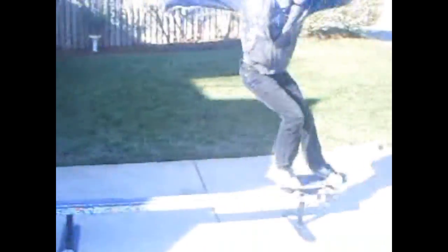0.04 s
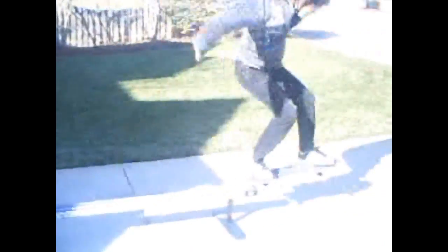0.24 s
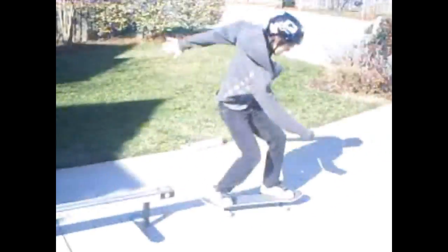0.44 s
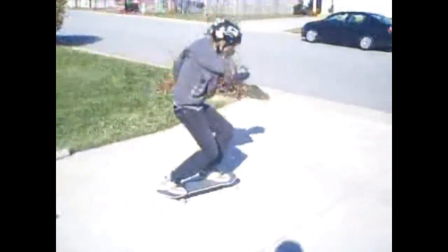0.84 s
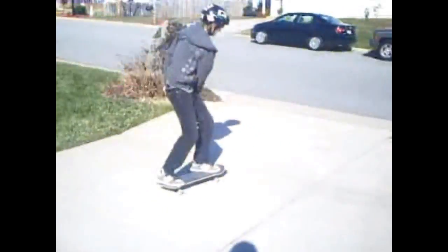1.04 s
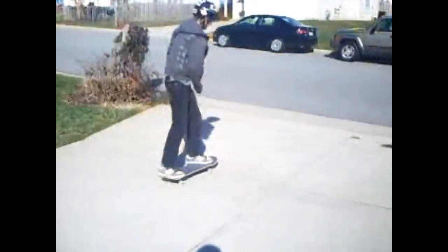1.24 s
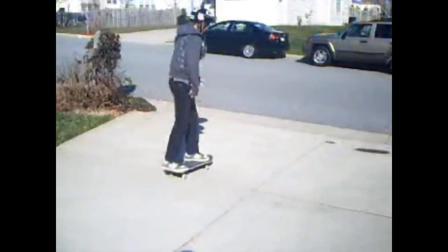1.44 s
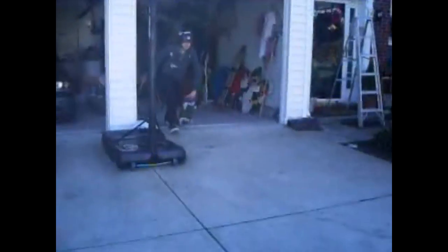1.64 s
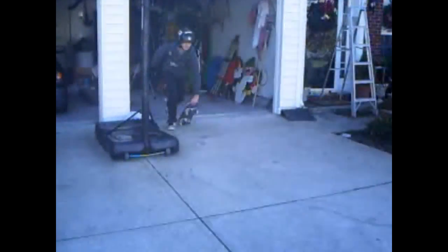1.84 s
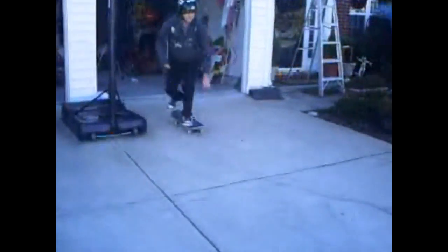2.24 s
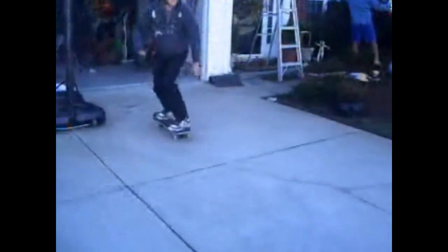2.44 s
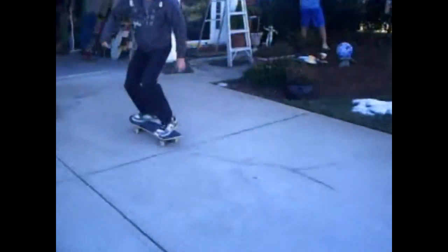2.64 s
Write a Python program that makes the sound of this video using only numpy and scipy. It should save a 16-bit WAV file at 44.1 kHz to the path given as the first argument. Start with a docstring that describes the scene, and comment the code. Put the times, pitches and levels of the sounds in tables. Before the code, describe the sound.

Skateboard clattering on a ringing steel rail, landing hard, then wheels rolling on concrete with clacks.

```python
"""A skateboard clatters off a steel rail, which rings on; it slaps down on concrete and rolls away.
After an abrupt change of scene the board is set down farther off, stepped on, and rolls closer.
Impacts excite damped modes of rail and deck, grit under the wheels drums on the board, and a yard
echoes the knocks. A small camera adds microphone wind, a brief motor buzz and overload on loud blows."""
import sys
import numpy as np
from scipy import signal
from scipy.fft import rfft, irfft
from scipy.io import wavfile
from scipy.ndimage import uniform_filter1d

SR = 44100
rng = np.random.default_rng(int(sys.argv[2]) if len(sys.argv) > 2 else 0)


def wav_out(sig):
    """Save sig, one row per channel (or a flat mono array), as 16-bit PCM at SR to the path in sys.argv[1]."""
    wavfile.write(sys.argv[1], SR, np.round(np.clip(np.atleast_2d(sig).T, -1, 1) * 32767).astype(np.int16))


N = 119070
T = np.arange(N) / SR
BIN_HZ = np.arange(N // 2 + 1) * SR / N
CUT_S = 1.626  # the scene changes
BAND_HZ = 5770  # upper edge of the camera's passband


def undb(db):
    """Decibels to amplitude ratio."""
    return 10 ** (np.asarray(db) / 20)


def unit(x):
    """Normalise to rms 1."""
    return x / np.sqrt(np.mean(x ** 2))


def on_log(points, hz):
    """Interpolate (frequency_hz, value) points on a log-frequency axis."""
    point_hz, values = np.array(points, float).T
    return np.interp(np.log(hz + 1e-9), np.log(point_hz), values)


def fader(points):
    """Amplitude envelope through (time_s, level_db) points, silent outside them."""
    time_s, level_db = np.array(points, float).T
    return undb(np.interp(T, time_s, level_db)) * (T >= time_s[0]) * (T <= time_s[-1])


def colour(x, points, tilt_db=0):
    """Band-limited filter through (frequency_hz, gain_db) points, tilted per octave about 1 kHz."""
    octaves = np.log2(np.clip(BIN_HZ, 100, 6000) / 1000)
    gain = undb(on_log(points, BIN_HZ) + tilt_db * octaves)
    return irfft(rfft(x) * gain * (BIN_HZ < BAND_HZ + 500), N)


def noise(points, tilt_db=0):
    """Spectrally shaped Gaussian noise of rms 1."""
    return unit(colour(rng.standard_normal(N), points, tilt_db))


def resonant_noise(hz, skirt_db):
    """Noise in one broad resonance, falling by skirt_db per octave below it and faster above."""
    return noise([(hz / 4, 2 * skirt_db), (hz, 0), (hz * 4, 3 * skirt_db), (hz * 16, 6 * skirt_db)])


def decay(start_s, t60_s, attack_s=0.00047):
    """Envelope of a damped vibration: quick onset, exponential fall."""
    age = np.maximum(T - start_s, 0)
    return (1 - np.exp(-age / attack_s)) * np.exp(-np.log(1000) * age / t60_s)


def ring(modes, start_s):
    """Free vibration: a sum of damped modes struck together."""
    return sum(undb(db) * decay(start_s, t60) * np.sin(2 * np.pi * hz * (T - start_s))
               for hz, db, t60 in modes)


def drift(rate_hz):
    """Smoothed random steps of rms 1."""
    size = int(SR / rate_hz)
    steps = np.repeat(rng.standard_normal(200), size)[:N]
    return unit(uniform_filter1d(np.resize(steps, N), size))


def rail():
    """Modal ringing: each strike clangs and feeds a steel tube's long modes, whose close pairs beat."""
    # trucks striking the rail: start_s, level_db
    strikes = [(0.2008, 0.5), (0.206, -3.5), (0.213, 7.5), (0.2187, 2), (0.229, 0.5), (0.238, 4),
               (0.251, 2.5), (.263, -8.5), (0.277, -17), (0.284, -20.5)]
    # tube modes, in parallel lists: pitch_hz, level_db, t60_s
    mode_hz = [498, 688, 699, 719, 781, 875, 906, 945, 992, 1256, 1413, 1488, 1678, 2163, 2971, 3371, 3531,
               4220, 5065, 5162, 5200]
    mode_db = [-22, -5.5, -8, -3, -6, -5.5, 3, -2.5, -8, -11.5, 0, -12, -13, -11, -15.5, -7, -13.5, -14.5,
               -9.5, -7, -7]
    mode_t60_s = [1.1, 1.25, 1.3, 1, .5, .55, .55, .7, .9, 1.0, .43, .41, .51, .5, .6, .24, .37, .38, .38,
                  .38, .4]
    # spectrum of dense modes and rattle: frequency_hz, density_db
    shimmer_spectrum = [(120, -47), (350, -18), (600, -26), (760, -7), (920, -5.5), (1150, -19.5),
                        (1480, -15.5), (1800, -24.5), (2130, -18.5), (2600, -24.5), (3400, -21.5),
                        (4600, -28), (5340, -13.5), (5800, -23.5)]
    # their damping by band: centre_hz, t60_s
    shimmer_bands = [(300, .7), (900, 0.89), (2500, 0.69), (5500, 0.49)]
    # contact noise spectrum: frequency_hz, density_db
    clang_spectrum = [(100, -14.5), (330, -15.5), (570, -20), (865, 4), (1120, -22), (1420, 1.5),
                      (1800, -13.5), (2170, -12.5), (2700, -20), (3430, -9), (4700, -16.5), (5280, -7),
                      (5800, -14.5)]

    def envelope(t60_s):
        """Incoherent summation: the decaying strikes add in energy."""
        return np.sqrt(sum((undb(db) * decay(start, t60_s)) ** 2 for start, db in strikes))

    age = T - strikes[0][0]
    waver_db = 2.0
    tube = 0
    for hz, db, t60 in zip(mode_hz, mode_db, mode_t60_s):
        gain = undb(db + waver_db * drift(rate_hz=21.5))
        tube += gain * envelope(t60) * np.sin(2 * np.pi * hz * age)
    dense_modes = rfft(noise(shimmer_spectrum))
    shimmer = 0
    for centre_hz, t60 in shimmer_bands:
        band_share = on_log([(hz, hz == centre_hz) for hz, _ in shimmer_bands], BIN_HZ)
        shimmer += irfft(dense_modes * band_share, N) * envelope(t60)
    clang = noise(clang_spectrum) * envelope(t60_s=0.098)
    return undb(-29) * tube + undb(-26) * shimmer + undb(-16.5) * clang


def board():
    """Impact excitation: blows on concrete crack and ring the deck; weight and flex thump beneath."""
    # thumps of the trucks first meeting the rail, then of the rider's weight: start_s, level_db, centre_hz,
    # t60_s
    thumps = [(.202, -19, 340, 0.17), (0.709, -6, 150, 0.035), (1.503, -33, 65, 0.095),
              (2.39, -28, 260, 0.1)]
    # board meeting concrete: start_s, level_db, tilt_db_per_octave, t60_s, ring_db
    blows = [(.6938, -19, 7, 0.034, 7), (.6985, -8, 1, 0.045, -1.5), (0.7067, -9, -0.9, 0.041, -17),
             (.7125, -10.5, -1, 0.017, -10), (2.3818, -38, 1.5, 0.055, -20),
             (2.392, -26.5, 8.5, 0.017, -5.5), (2.396, -21, -1, 0.18, -1.5), (2.405, -23, 0, 0.0317, -3),
             (2.416, -23.5, 0, 0.054, -4), (2.433, -28, -1.5, 0.2, -7)]
    # spectrum of the crack: frequency_hz, density_db
    crack_spectrum = [(60, -22.5), (170, -14), (300, 0.5), (620, -14.5), (790, 2.5), (1080, -11.5),
                      (1490, -3), (1950, -15.5), (2230, -9.5), (2700, -24.5), (4000, -26), (5800, -28.5)]
    # deck and truck modes: pitch_hz, level_db, t60_s
    deck_modes = [(328.4, -2.5, 0.049), (494.4, -18, 0.17), (590.5, -8.5, 0.053), (799, 2, 0.048),
                  (1520, -14, 0.068), (1683, -15, 0.042), (2206, -11.5, 0.058)]
    impacts = sum(undb(db) * resonant_noise(hz, skirt_db=-11.5) * decay(start, t60, attack_s=0.002)
                  for start, db, hz, t60 in thumps)
    for start, db, tilt_db, t60, ring_db in blows:
        crack = noise(crack_spectrum, tilt_db) * decay(start, t60)
        impacts += undb(db) * (crack + undb(ring_db) * ring(deck_modes, start))
    return impacts


def set_down():
    """Impulse response: wheels set on concrete give one hard clack of heavily damped modes."""
    # wheel and truck modes: pitch_hz, level_db, t60_s
    modes = [(834, -9.5, 0.051), (1528, 1, 0.029), (2014, -6.5, 0.033), (2350, -11, .03)]
    # contact noise spectrum: frequency_hz, density_db
    contact_spectrum = [(200, -14), (900, -2), (1600, -3.5), (2300, -2), (2800, -15), (5800, -17.5)]
    start_s = 2.1236
    contact = noise(contact_spectrum) * decay(start_s, t60_s=0.031)
    return undb(-19.5) * (ring(modes, start_s) + undb(-8.5) * contact)


def clacks():
    """Strong damping: small hard parts knock with short, broad resonances."""
    # wheels, grit, rail and hardware: start_s, level_db, centre_hz, skirt_db_per_octave, t60_s
    taps = [(0.1095, -37, 870, -25, 0.032), (.468, -31, 950, -31.5, 0.19), (1.505, -38, 2920, -6, 0.018),
            (1.616, -45, 1994, -13, .03), (1.646, -46.5, 1200, -7.5, 0.058), (1.679, -53, 4500, -2, .03),
            (1.775, -53, 2180, -6, 0.026), (1.837, -51.5, 894, -9.5, 0.037),
            (1.8752, -28, 2600, -12, 0.0087), (1.875, -45.5, 856, -10, 0.064), (1.891, -39, 5200, 0, 0.01),
            (1.934, -51, 3000, -12, 0.015), (2.113, -41, 2990, -11, 0.025),
            (2.2584, -26.5, 820, -12, 0.041), (2.2883, -42, 1820, -24, 0.17), (2.472, -41, 4480, -5, .012),
            (2.601, -28.5, 780, -22, .03)]
    return sum(undb(db) * resonant_noise(hz, skirt_db) * decay(start, t60)
               for start, db, hz, skirt_db, t60 in taps)


def wheels(levels, spectrum, flutter_db):
    """Shot noise: random grit impacts under the wheels drum unevenly on the board's resonances."""
    grains_per_s, spread_db = 12000, 2.0
    grit = (rng.random(N) < grains_per_s / SR) * rng.standard_normal(N)
    grit *= undb(spread_db * np.minimum(rng.exponential(size=N), 5))
    flutter = undb(flutter_db * drift(rate_hz=50))
    return unit(colour(grit, spectrum)) * fader(levels) * flutter


def ride_away():
    """Roughness excitation: a fading grind, then rolling from the landing until the scene changes."""
    # envelopes of grinding and rolling: time_s, level_db
    grind_levels = [(0, -34.5), (.03, -41), (.06, -44.5), (.11, -47.5), (.2, -54.5)]
    roll_levels = [(.7, -62), (.74, -30.5), (.86, -41.5), (1.05, -44), (1.35, -42.5), (1.62, -43.5)]
    # their spectra: frequency_hz, density_db
    grind_spectrum = [(88, -32), (150, -16), (281, -14.5), (332, -1.5), (450, -19), (620, -15), (810, 1.5),
                      (1050, -14.5), (1520, -6.5), (1820, -20), (2400, -12), (2900, -24), (3400, -18.5),
                      (3750, -27), (5800, -29.5)]
    roll_spectrum = [(47, -47.5), (80, -3), (203, 0), (439, -6.5), (595, -14), (687, -10.5), (883, -4.5),
                     (1080, -17.5), (1430, -14), (2880, -35), (3390, -27), (4130, -38.5), (5800, -38)]
    grind = wheels(grind_levels, grind_spectrum, flutter_db=2.0)
    roll = wheels(roll_levels, roll_spectrum, flutter_db=1.22)
    return (grind + roll) * (T < CUT_S)


def ride_closer():
    """Mass loading: the board runs light, then rumbles deeper under the rider's weight."""
    # rolling envelopes: time_s, level_db
    light_levels = [(2.124, -40), (2.14, -39.5), (2.2, -45), (2.245, -46.5), (2.275, -41), (2.33, -40),
                    (2.39, -50.5)]
    loaded_levels = [(2.39, -40), (2.42, -37.5), (2.48, -35), (2.55, -38), (2.62, -36.5), (2.66, -33.5),
                     (2.7, -37)]
    # rolling spectra: frequency_hz, density_db
    light_spectrum = [(100, -20), (220, -9), (350, 1), (520, -16), (800, 5.5), (1150, -13.5), (1500, -6.5),
                      (2100, -15.5), (3000, -27.5), (5800, -29)]
    loaded_spectrum = [(59, -36.5), (100, -8), (145, -4.5), (230, -5), (312, -6.5), (566, -15.5), (755, 1),
                       (1080, -16.5), (1460, -11), (2440, -32.5), (5800, -40)]
    light = wheels(light_levels, light_spectrum, flutter_db=2.0)
    loaded = wheels(loaded_levels, loaded_spectrum, flutter_db=1.23)
    return light + loaded


def yard(knocks):
    """Diffuse reflection: house and fence scatter the knocks back, over a short reverberant tail."""
    # scattered echoes: delay_s, level_db, t60_s
    reflections = [(0.028, -13, 0.056), (.064, -15.5, 0.025), (0.0046, -20.5, 0.44)]
    # frequency response of the yard: frequency_hz, gain_db
    yard_response = [(100, -20), (330, -15.5), (500, -4.5), (790, -9), (1130, 13), (1500, -2.5), (2200, -8),
                     (2800, 4), (4200, -5), (5800, -4)]
    impulse_response = 0
    for delay, db, t60 in reflections:
        scatter = rng.standard_normal(N) * decay(delay, t60)
        impulse_response += undb(db) * scatter / np.sqrt(np.sum(scatter ** 2))
    return colour(signal.fftconvolve(knocks, impulse_response)[:N], yard_response)


def lens_motor():
    """Structure-borne sound: the motor's periodic ticks buzz through the camera's case."""
    # envelope of the buzz: time_s, level_db
    levels = [(1.8, -68), (1.89, -51), (2.1, -52.5), (2.35, -63), (2.45, -67)]
    # frequency response of the case: frequency_hz, gain_db
    case_response = [(85, 2.5), (250, -5), (500, -14), (800, -19.5), (2000, -51)]
    ticks_per_s = 85.2
    ticks = np.diff(np.floor(ticks_per_s * T), prepend=0)
    return unit(colour(ticks - ticks.mean(), case_response)) * fader(levels)


def background():
    """Turbulent pressure: wind rumbles on the microphone, over outdoor air and a faint hum."""
    # wind strength: time_s, gain_db
    gusts = [(0, 5), (.4, 5.5), (1, 2.5), (1.55, 2.5), (2.1, -1), (2.7, 2)]
    # spectra of wind and outdoor air: frequency_hz, density_db
    wind_spectrum = [(8, -0.5), (28, -8), (55, -8.5), (100, -17.5), (200, -23.5), (500, -52.5)]
    air_spectrum = [(88, -30.5), (150, -2.5), (458, -5), (940, -6.5), (1810, -19), (2830, -17), (4210, -27),
                    (5290, -15), (5800, -31)]
    hum_hz = 60.3
    wind = undb(-47) * fader(gusts) * noise(wind_spectrum)
    air = undb(-63.5) * noise(air_spectrum)
    hum = undb(-56) * np.sin(2 * np.pi * hum_hz * T)
    return wind + air + hum


def scene():
    """Superposition: both rides in turn, their echoes and the background add in one channel."""
    knocks = board() + set_down() + clacks()
    echoes = yard(knocks * np.where(T < CUT_S, 1, undb(-6.5)))  # weaker on the second ride
    rolling = ride_away() + ride_closer()
    return (rail() + knocks + echoes + rolling + lens_motor() + background())[None]


def record(dry):
    """Saturation: the microphone overloads; the camera narrows the band and clips what overshoots."""
    clip_level, top_hz = 0.505, 15800
    band_limit = signal.cheby1(14, 0.3, BAND_HZ, fs=SR, output="sos")
    top_limit = signal.ellip(8, 0.2, 70, top_hz, fs=SR, output="sos")
    overloaded = np.clip(dry, -clip_level, clip_level)
    narrow = signal.sosfilt(band_limit, overloaded)
    clipped = np.clip(narrow, -clip_level, clip_level)
    return signal.sosfilt(top_limit, clipped)


dry = scene()
out = record(dry)
wav_out(out)
```